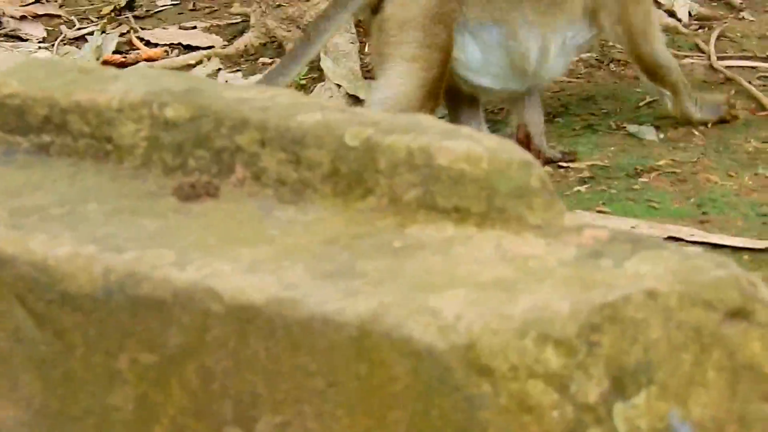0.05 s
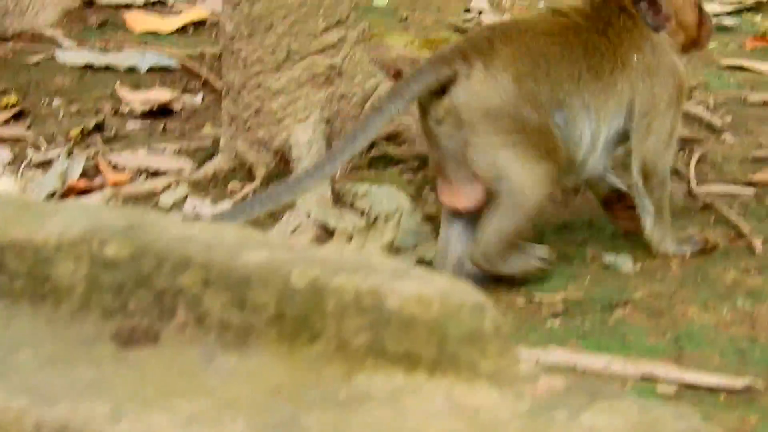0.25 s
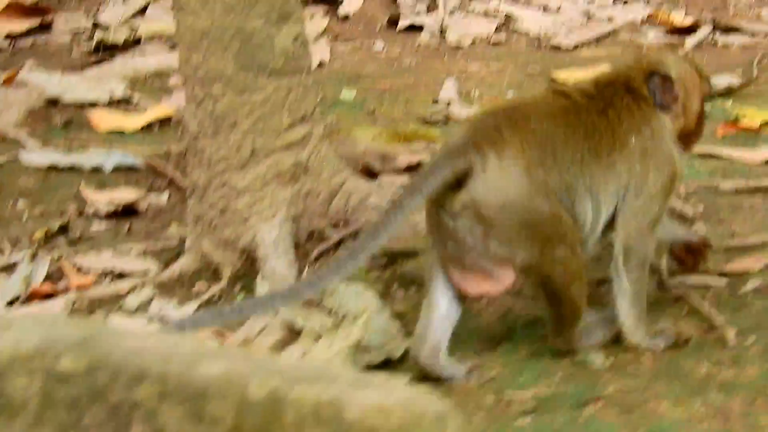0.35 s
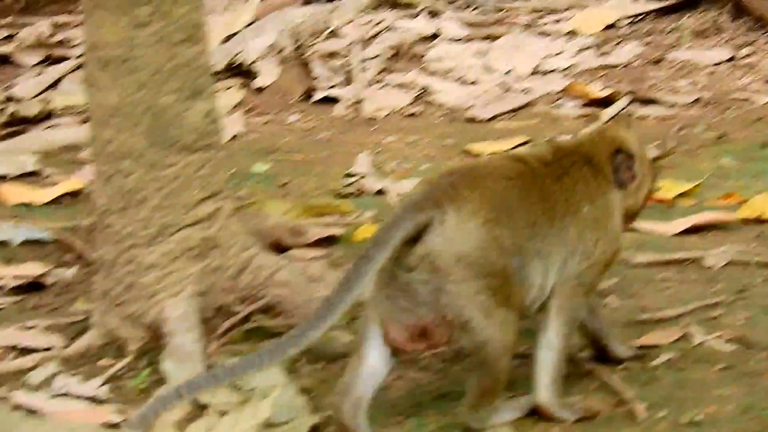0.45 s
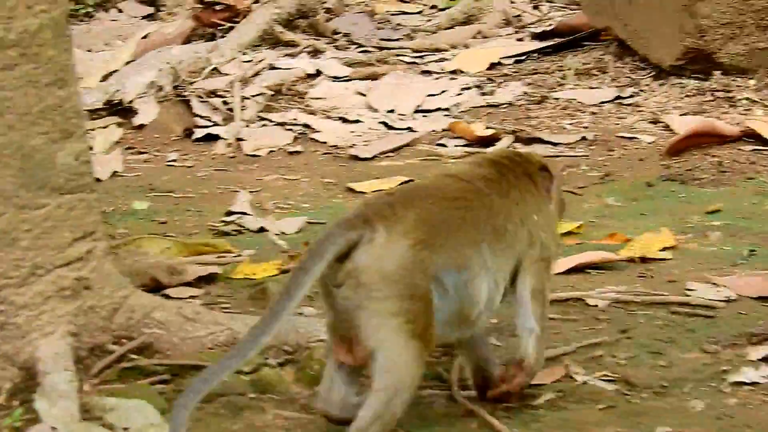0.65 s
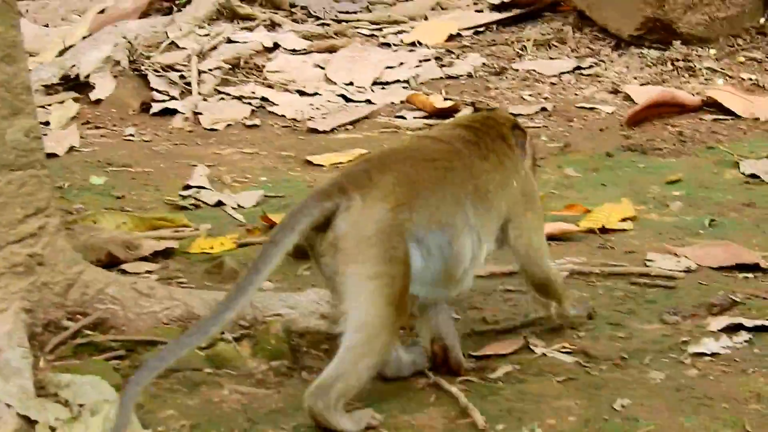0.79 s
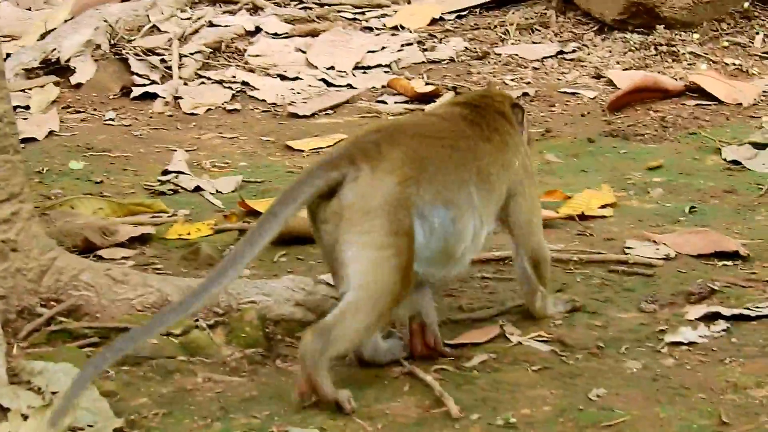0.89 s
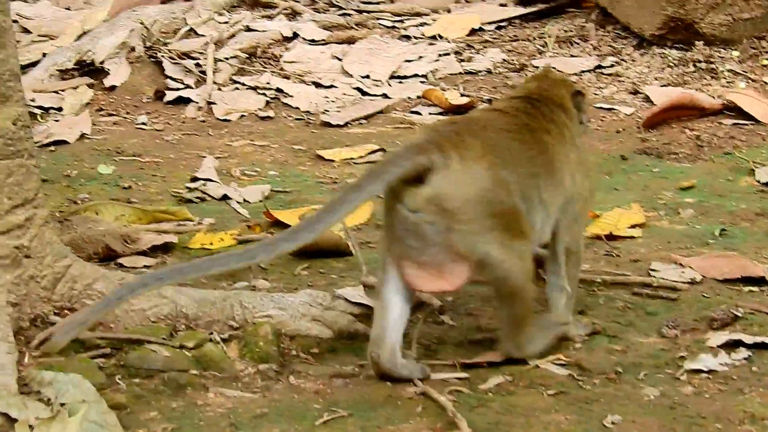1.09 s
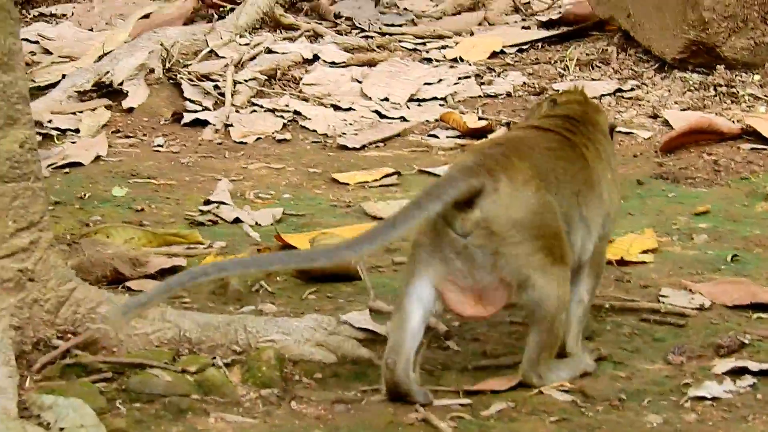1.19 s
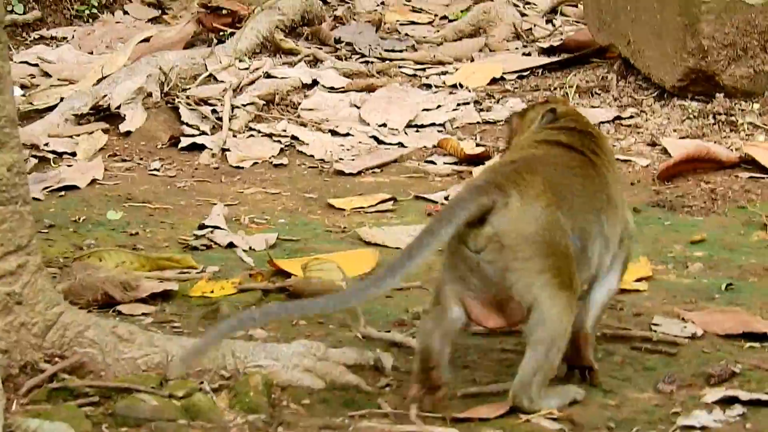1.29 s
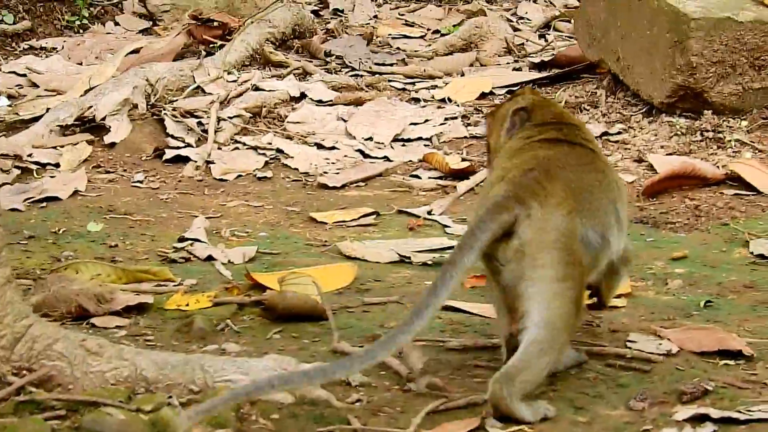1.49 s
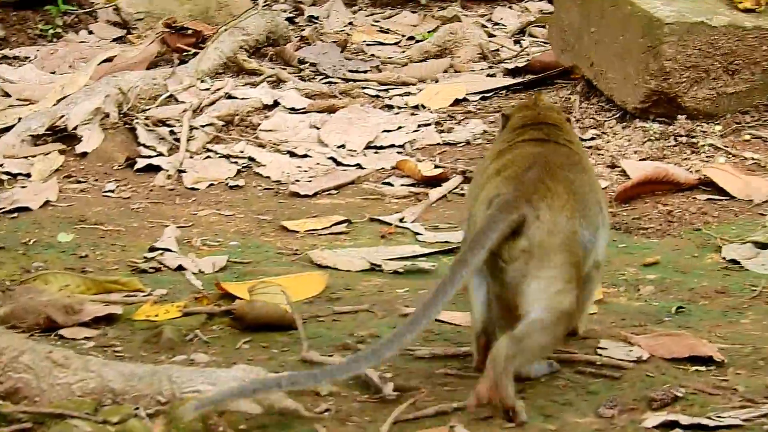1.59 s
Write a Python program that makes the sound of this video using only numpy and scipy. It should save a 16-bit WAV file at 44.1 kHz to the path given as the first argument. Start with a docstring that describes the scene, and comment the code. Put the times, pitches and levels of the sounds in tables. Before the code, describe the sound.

Dry leaf litter rustles and snaps as a monkey steps over the ground outdoors.

```python
"""Outdoors, on bare earth and dry leaf litter: a monkey walks away.
Each step or drag crushes leaves: a papery body, with crisp crackle mostly just after.
Single twigs and leaf ribs snap; a palm pats the earth twice.
A thin whistled call sounds in the distance, over a low rumble and faint hiss."""
import sys
import numpy as np
from scipy import signal
from scipy.fft import rfft, irfft
from scipy.io import wavfile

SR = 44100
rng = np.random.default_rng(int(sys.argv[2]) if len(sys.argv) > 2 else 0)


def waveform_to_disk(signal):
    """Save audio, clipped to [-1, 1], as 16-bit WAV at the path in sys.argv[1]."""
    frames = np.transpose(np.atleast_2d(signal))
    scaled = np.clip(frames, -1, 1) * 32767
    samples = np.round(scaled).astype(np.int16)
    wavfile.write(sys.argv[1], SR, samples)


N = 72765
HZ, TIME = np.fft.rfftfreq(N, 1 / SR), np.arange(N) / SR

# dry leaf spectrum: freq_hz, density_db
LEAF_SPECTRUM = [(30, -70), (150, -34), (400, -33.5), (700, -12), (1000, -1), (1350, 1.5), (1750, -0.5),
                 (2200, 1.5), (3000, 2), (3700, 1), (4400, -2.5), (5400, -5), (6700, 4), (7500, -1),
                 (8300, -11), (9300, -19), (11000, -25.5), (13000, -38.5), (15500, -49)]


def amp(db):
    """Decibels to gain."""
    return 10 ** (np.asarray(db) / 20)


def unit(x):
    """Scale to rms 1."""
    return x / np.sqrt(np.mean(abs(x) ** 2) + 1e-20)


def curve(points):
    """Table interpolated over log frequency."""
    freq_hz, value = np.transpose(points)
    return np.interp(np.log(HZ + 1), np.log(freq_hz), value)


def lowpass(edge_hz):
    """Gain of a steep low-pass."""
    return 1 / (1 + (HZ / edge_hz) ** 24)


def drift(scale_s):
    """Smooth random wander, rms 1."""
    return unit(irfft(rfft(rng.standard_normal(N)) * np.exp(-(HZ * scale_s) ** 2), N))


def microphones(left, other, side):
    """Two spectra to a stereo pair: alike in the bass, apart in the treble."""
    # left-right likeness: freq_hz, coherence
    likeness = [(130, .995), (300, .992), (1200, .975), (2500, .88), (4000, .55), (6500, .66), (10000, .66),
                (15000, .25)]
    # right channel lag at side 1: freq_hz, phase_rad
    phase_lag = [(100, 0), (2500, .02), (3500, .2), (4600, 1.7), (6500, 2.6), (8000, 3), (10000, 3.3),
                 (12000, 5)]
    coherence = curve(likeness)
    right = coherence * left + np.sqrt(1 - coherence ** 2) * other
    return np.array([left, right * np.exp(-1j * side * curve(phase_lag))])


def panned(pan_db):
    """Gains for a left-minus-right level that fades below 900 Hz."""
    db = pan_db * HZ ** 2 / (HZ ** 2 + 900 ** 2)
    return amp([db / 2, -db / 2]) / np.sqrt((amp(db) + amp(-db)) / 2)


def air():
    """Distant rumble swells and sinks under a steady hiss."""
    # outdoor air spectrum: freq_hz, density_db
    spectrum = [(12, -62), (25, -36), (45, -15), (65, -8), (100, 1.5), (135, -0.5), (210, -7), (310, -12.5),
                (500, -15.5), (1300, -18.5), (3500, -24), (7000, -28.5), (9000, -29.5), (12000, -31.5),
                (15500, -44)]
    # rumble swell: time_s, gain_db
    swell = [(0, 0), (.25, 3), (.45, -1), (.65, 2.5), (.78, -1), (.87, 4), (1.05, -2.5), (1.25, -1),
             (1.65, -3)]
    noise = microphones(*rfft(rng.standard_normal((2, N))) * unit(amp(curve(spectrum))), side=0)
    low = lowpass(570)
    rumble = irfft(noise * low, N) * amp(np.interp(TIME, *np.transpose(swell)))
    hiss = irfft(noise * (1 - low), N)
    return amp(-68) * (rumble + hiss)


def echoes(dry, t60_s=0.26, taps_per_s=2000):
    """Trunks and stones scatter a short tail."""
    t = TIME[:SR // 2]
    shape = (2, len(t))
    taps = rng.standard_normal(shape) * (rng.random(shape) < taps_per_s / SR) * amp(-60 * t / t60_s)
    taps /= np.linalg.norm(taps, axis=1, keepdims=True)
    return signal.fftconvolve(dry, taps, axes=1)[:, :N]


def distant_call(waver_share=0.0074, ramp_s=0.0093):
    """A far animal holds one thin, nearly pure note."""
    # whistle contour: time_s, pitch_hz, level_db
    contour = [(.66, 1320, -97), (.686, 1300, -63.5), (.716, 1323, -69), (.756, 1310, -64),
               (.772, 1316, -52.5), (.81, 1316, -59.5), (.854, 1317, -56.5), (.876, 1322, -48),
               (.905, 1319, -58), (0.961, 1343, -71)]
    time_s, pitch_hz, level_db = np.transpose(contour)
    wavering_hz = np.interp(TIME, time_s, pitch_hz) * (1 + waver_share * drift(scale_s=0.0081))
    gate = np.clip(np.minimum(TIME - time_s[0], time_s[-1] - TIME) / ramp_s, 0, 1)
    rms = amp(np.interp(TIME, time_s, level_db)) * gate
    return np.sqrt(2) * rms * np.sin(2 * np.pi * np.cumsum(wavering_hz) / SR)


def knocks(rows):
    """Impacts: decaying noise bursts, each ringing in one band."""
    leaf_tint = amp(curve(LEAF_SPECTRUM) / 2)
    out = np.zeros((2, N))
    for start_s, peak_db, pitch_hz, width_oct, decay_s, pan_db in rows:
        t = TIME - start_s
        burst = rng.standard_normal((2, N)) * (t >= 0) * np.exp(-abs(t) / decay_s)
        detune = np.log2((HZ + 1) / pitch_hz) / width_oct
        ring = lowpass(pitch_hz * 2 ** (2 * width_oct)) / (1 + 1j * detune) ** 2
        pair = microphones(*rfft(burst) * ring * leaf_tint, side=0.85)
        knock = irfft(pair * panned(pan_db), N)
        out += knock / abs(knock).max() * amp(peak_db)
    return out


def footfalls():
    """A palm pats the earth: low, broad knocks."""
    # pats: start_s, peak_db, pitch_hz, width_oct, decay_s, pan_db
    pats = [ (.293, -43, 606, 0.77, 0.0067, 2), (1.124, -48.5, 816, 0.6, 0.019, 10)]
    return knocks(pats)


def snaps():
    """Twigs and leaf ribs break: short, bright knocks."""
    # breaks: start_s, peak_db, pitch_hz, width_oct, decay_s, pan_db
    breaks = [ (0.2001, -30.5, 1290, 0.48, 0.0016, -3.5), (0.209, -29.5, 2060, 0.33, 0.0011, 6),
              (.2165, -27, 2200, 0.21, 0.0065, 12), (.236, -32, 1370, .25, 0.0085, 3),
              (0.2655, -26, 5370, 0.52, 0.00077, 16), (0.289, -28, 6500, 0.34, .002, -20),
              (0.388, -34, 6300, .3, 0.00072, 23), (0.564, -49.5, 6900, 0.32, 0.0025, -11),
              (0.636, -39, 1650, 0.5, 0.00046, -19), (0.84, -37.5, 6850, 0.055, 0.0061, -24),
              (0.865, -32, 6740, 0.064, 0.0037, -21), (0.879, -36.5, 1600, 0.22, 0.0017, -2),
              (1.0552, -33.5, 3040, 0.3, 0.0014, -10), (1.138, -31.5, 7380, 0.19, 0.0023, 2),
              (1.3456, -54, 1730, 0.12, 0.0015, 12), (1.377, -49, 1720, 0.35, 0.0021, -6),
              (1.605, -44, 2730, .4, .001, -17), (1.6275, -36, 5400, 0.19, 0.0024, -11)]
    return knocks(breaks)


def crackle(cracks_per_s=3500, spread_db=2, rub_share=0.45, clump_db=1.06):
    """Clumps of tiny uneven fractures over the rub of leaf on leaf."""
    size = amp(spread_db * np.minimum(rng.exponential(1, N), 4))
    cracks = size * (rng.random(N) < cracks_per_s / SR) * rng.choice([-1, 1], (2, N))
    rub = rng.standard_normal((2, N))
    clumps = amp(clump_db * drift(scale_s=0.013))
    return unit((np.sqrt(1 - rub_share) * unit(cracks) + np.sqrt(rub_share) * rub) * clumps)


def leaf_patch(ring_hz, ring_db, treble_db, width_oct=0.17, mode_spacing_hz=89.1, mode_db=3):
    """Response of one patch of leaves: main peak or dip, uneven small resonances, treble shelf."""
    count = int(HZ[-1] / mode_spacing_hz) + 1
    strengths = np.resize(rng.standard_normal(1024), count)
    modes = np.interp(HZ / mode_spacing_hz, np.arange(count), strengths)
    ring = 1 / (1 + (np.log2((HZ + 1) / ring_hz) / width_oct) ** 2)
    return amp(ring_db * ring + mode_db * modes + treble_db * (1 - lowpass(7720)))


def scuffs():
    """Each foot presses in, holds, and lets the leaves settle."""
    # steps and drags: start_s, rise_s, hold_s, fade_db_per_s, body_db, crunch_db, crisp_db,
    # crisp_delay_s, crunch_pan_db, crisp_pan_db, side (sign only), ring_hz, ring_db, treble_db
    steps = [ (-.03, 0.048, 0.087, 94, -64, -66, -52.5, -0.0027, 2.5, 2, -1, 2930, 5, 1.5),
             (0.2, 0.021, 0.028, 290, -41.5, -43.5, -36.5, 0.0091, 2.5, -2, -1, 2110, 3.5, 2),
             (0.234, 0.011, 0.014, 138.5, -46, -45.5, -35.5, 0.0085, 0, -1, -0.83, 5740, 1, 0),
             (0.49, 0.0046, .006, 394, -79, -72, -61.5, 0.015, -11, -2, -1, 3270, 7, 6.5),
             (.585, 0.0052, 0.005, 309, -79, -85, -69, -0.007, -8, 27, 1, 1310, 9, 6),
             (0.626, 0.0033, 0.069, 70, -66.5, -71.5, -73.5, 0.015, -10, -0.5, 1, 5660, 15.5, 11),
             (0.678, 0.088, 0.079, 132, -65, -64.5, -53, 0.024, 0.5, -1, 1, 2060, 7.5, 1),
             (0.845, .02, 0.011, 210, -53, -48.5, -40, 0.0037, 3, -6.5, 1, 1940, 6.5, -14),
             (.925, 0.009, 0.014, 402, -65.5, -72, -54, -0.012, -2, 0, 1, 1452, 12.5, 4),
             (0.964, 0.015, 0.023, 180, -60.5, -58.5, -49, 0.0017, 8, 4.5, 1, 2035, 10, 3),
             (1.046, 0.019, 0.031, 227, -61, -58.5, -50.5, 0.0059, 10.5, 2.5, 1, 1520, 10, -2.5),
             (1.094, 0.014, .018, 208, -57.5, -60.5, -47, 0.016, 12, 6.5, 1, 1720, -14, 0.5),
             (1.114, 0.0057, 0.026, 178, -68.5, -57.5, -54, 0.013, 7, 2, 1, 7600, 3, -1),
             (1.302, 0.035, 0.066, 108, -68, -74.5, -75, -0.0078, -1, 1, -0.88, 7100, 6, -3),
             (1.383, 0.014, .03, 146, -73, -80, -71, .002, -3, -3, -1, 4600, 14, 1),
             (1.416, 0.014, 0.0037, 400, -64, -68, -67, 0.017, 7.5, 13, -0.46, 2390, 15.5, -6),
             (1.458, 0.021, 0.012, 253, -70.5, -70, -62, -0.0027, 7.5, 3, -1, 2840, 6.5, -3),
             (1.591, 0.015, 0.0085, 330, -73.5, -60, -69, 0.026, -16, -17, 1, 2150, 6, 0),
             (1.619, 0.011, 0.0024, 654, -68.5, -86, -57, -0.0028, -5, -1.5, 1, 5360, 19.5, 10.5)]
    leaf = amp(curve(LEAF_SPECTRUM))
    low, low_mid = lowpass(1970), lowpass(4320)
    body, crunch, crisp = (unit(leaf * band) for band in (low, low_mid - low, 1 - low_mid))
    out = 0
    for (start_s, rise_s, hold_s, fade_db_per_s, body_db, crunch_db, crisp_db,
         crisp_delay_s, crunch_pan_db, crisp_pan_db, side, *patch) in steps:
        grains, scuff = crackle(), 0
        layers = [(body, body_db, 0, 0.95 * crunch_pan_db),
                  (crunch, crunch_db, 0, crunch_pan_db),
                  (crisp, crisp_db, crisp_delay_s, crisp_pan_db)]
        for colour, gain_db, delay_s, pan_db in layers:
            t = TIME - start_s - delay_s
            settle_db = fade_db_per_s * np.maximum(t - rise_s - hold_s, 0)
            press = np.clip(t / rise_s, 0, 1) * amp(gain_db - settle_db)
            scuff += microphones(*rfft(grains * press) * colour, np.sign(side)) * panned(pan_db)
        out += scuff * leaf_patch(*patch)
    return irfft(out, N)


def scene():
    """Steps and call with weak echoes, in open air."""
    direct = scuffs() + snaps() + footfalls() + distant_call()
    return direct + amp(-9.5) * echoes(direct) + air()


def record(dry, cutoff_hz=15650):
    """Band limit."""
    taps = signal.firwin(511, cutoff_hz, window=("kaiser", 9), fs=SR)
    return signal.oaconvolve(dry, taps[None], "same")


dry = scene()
out = record(dry)
waveform_to_disk(out)
```